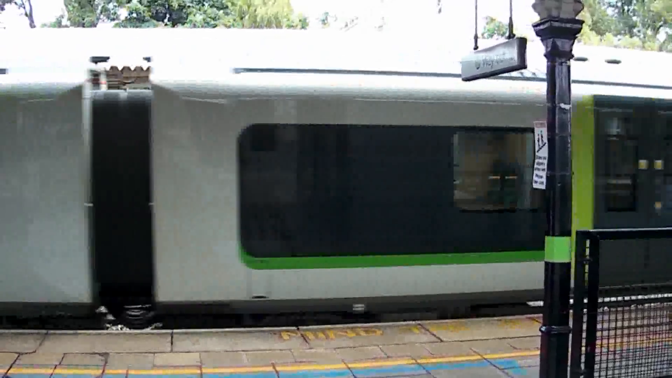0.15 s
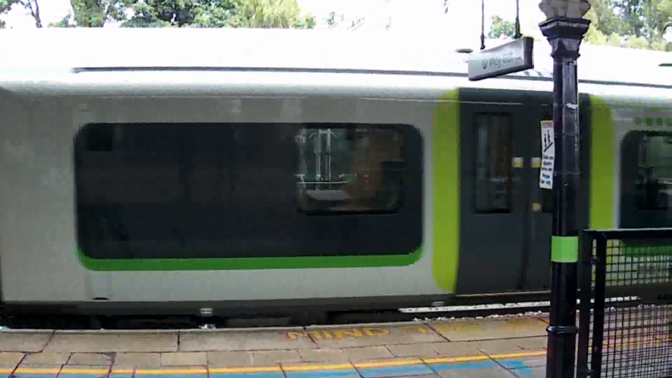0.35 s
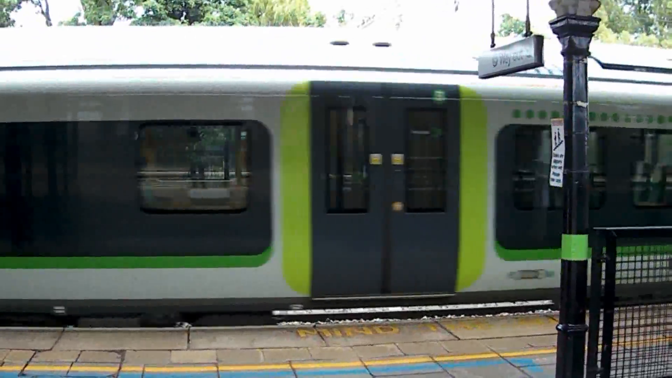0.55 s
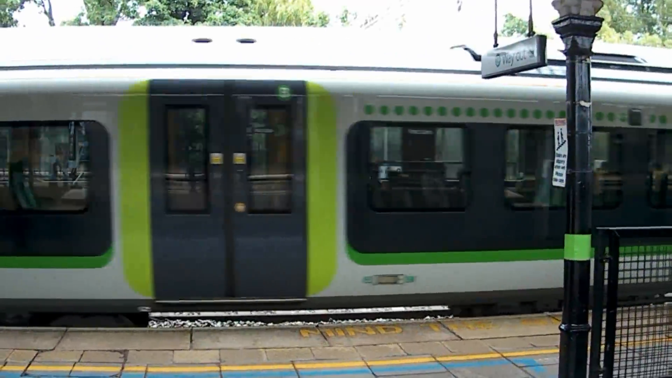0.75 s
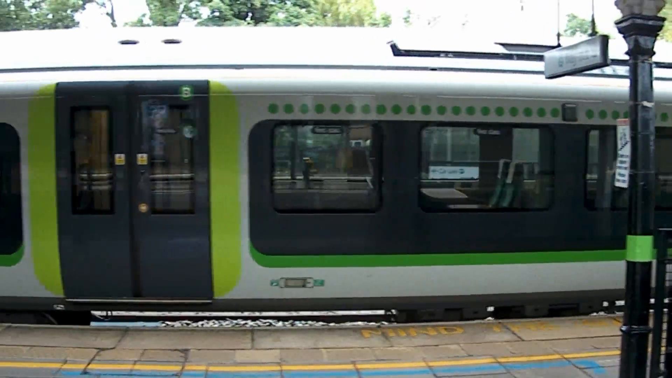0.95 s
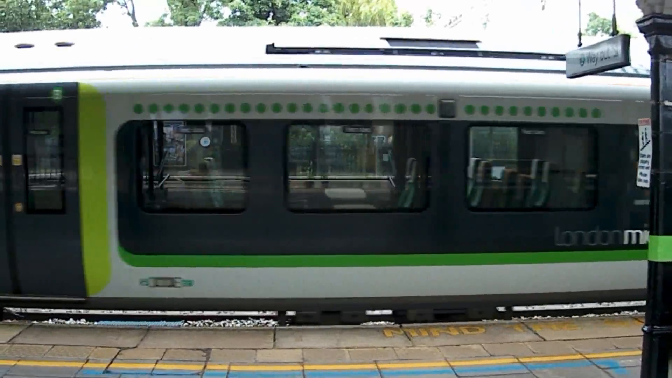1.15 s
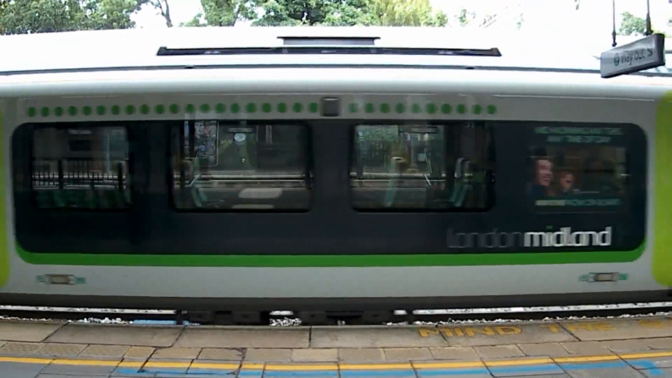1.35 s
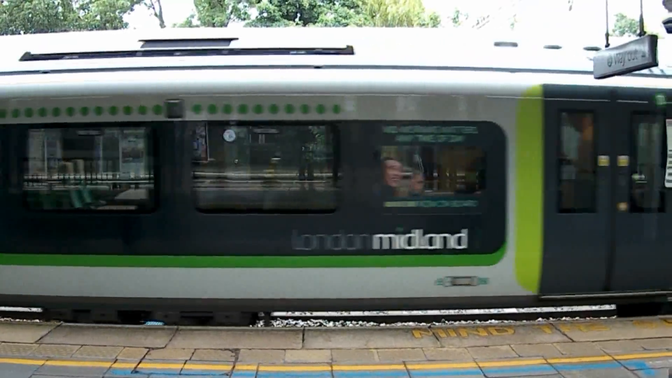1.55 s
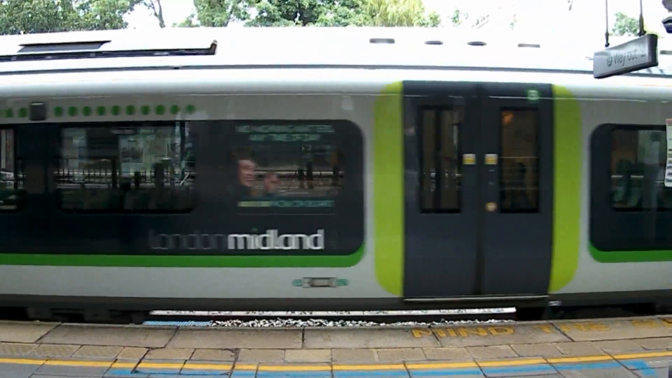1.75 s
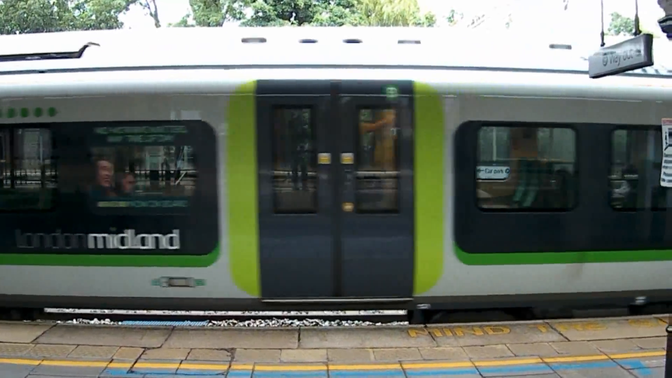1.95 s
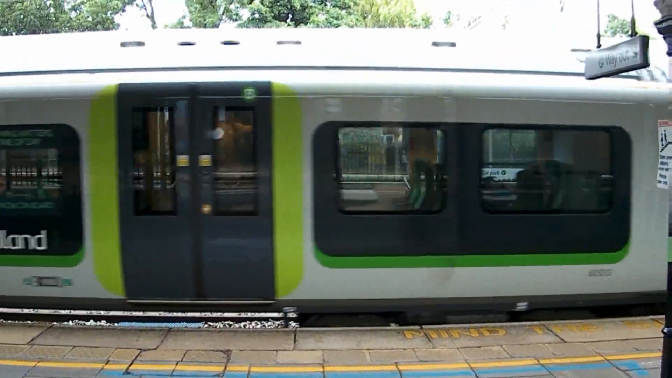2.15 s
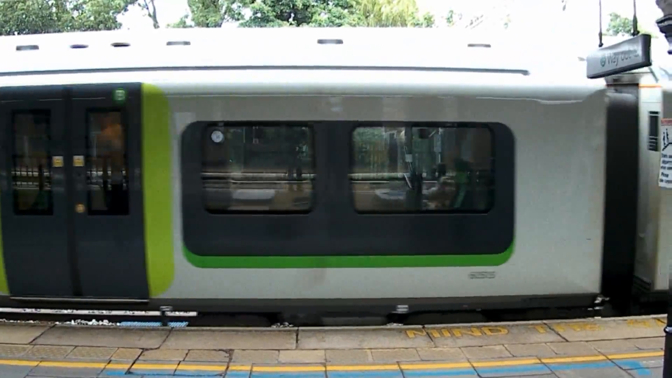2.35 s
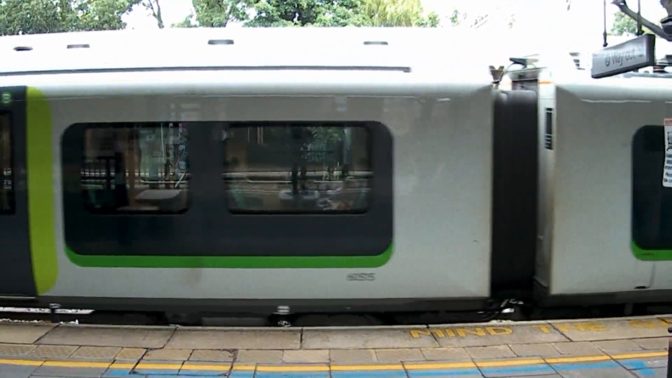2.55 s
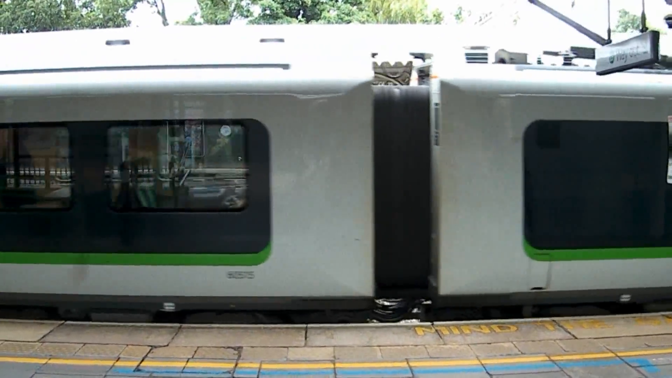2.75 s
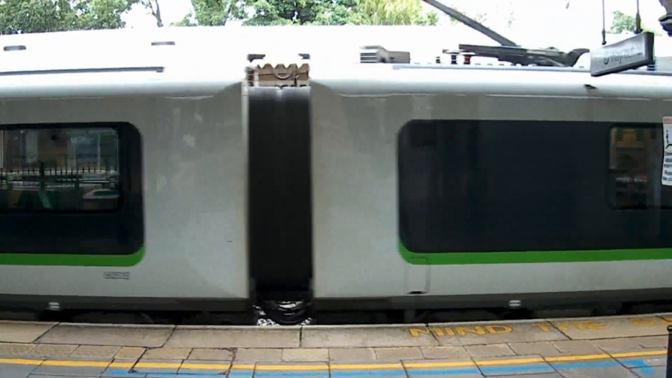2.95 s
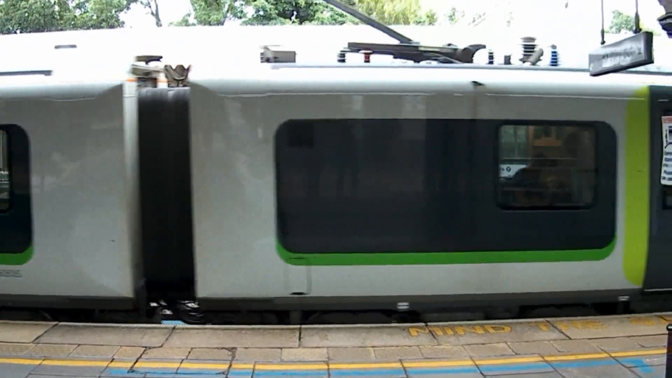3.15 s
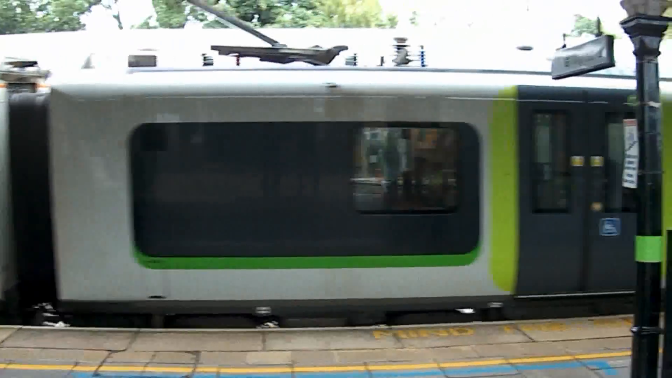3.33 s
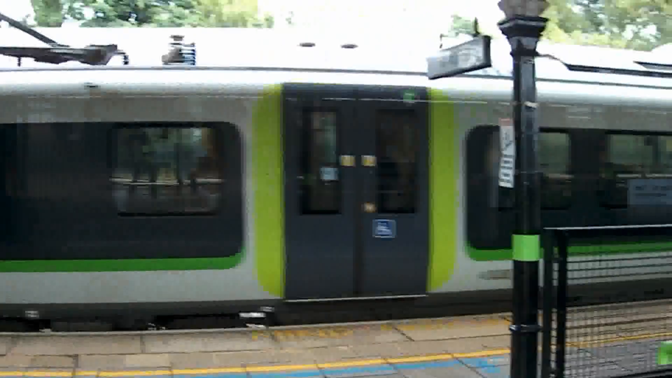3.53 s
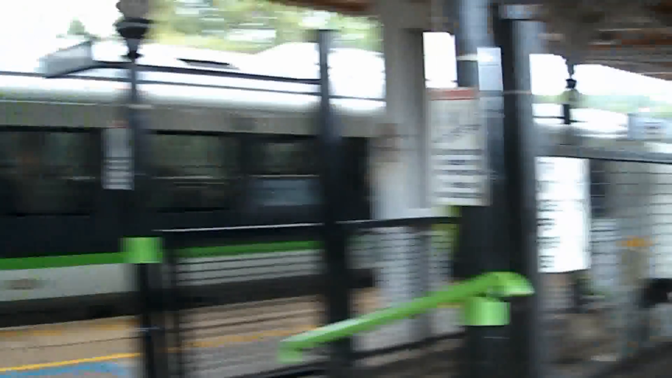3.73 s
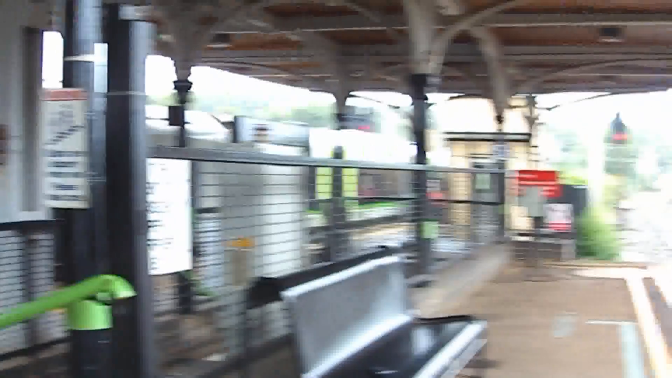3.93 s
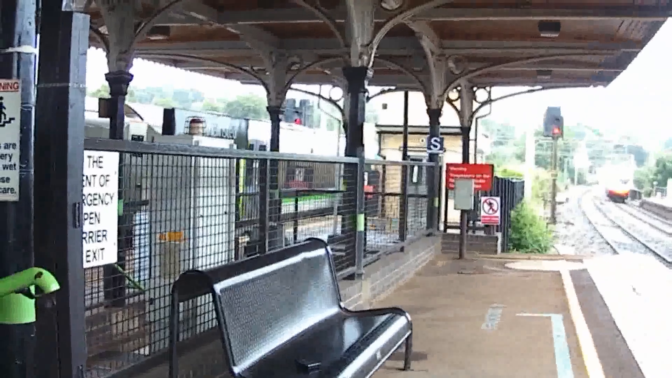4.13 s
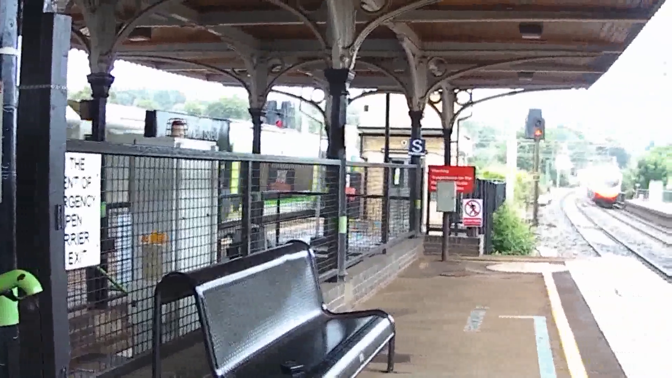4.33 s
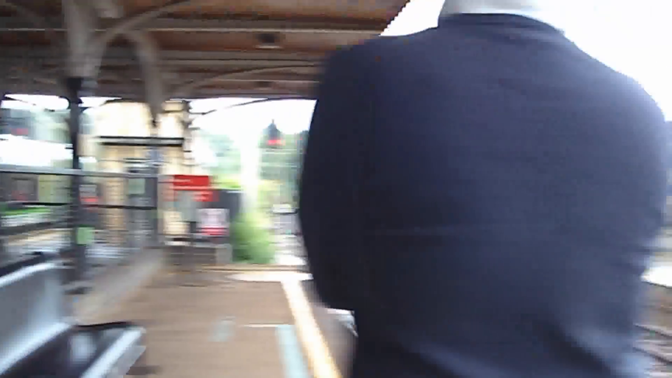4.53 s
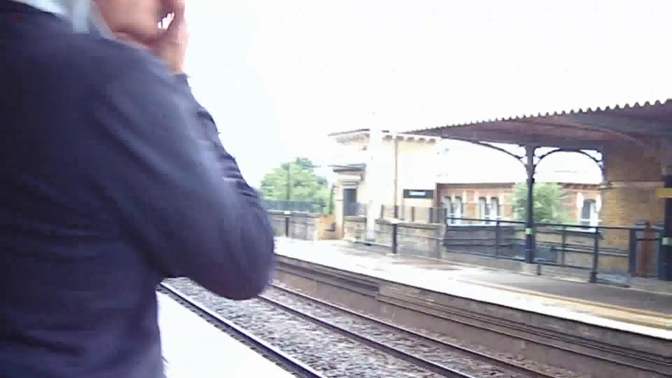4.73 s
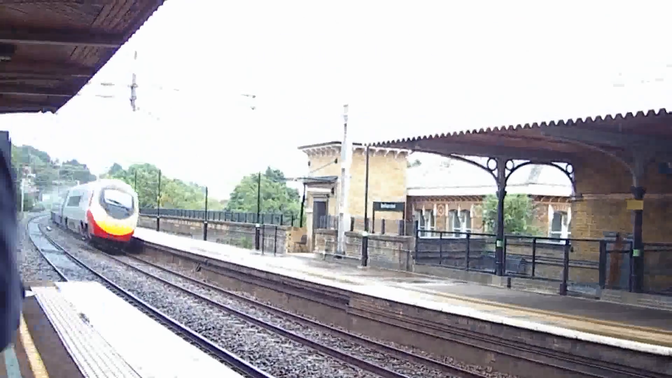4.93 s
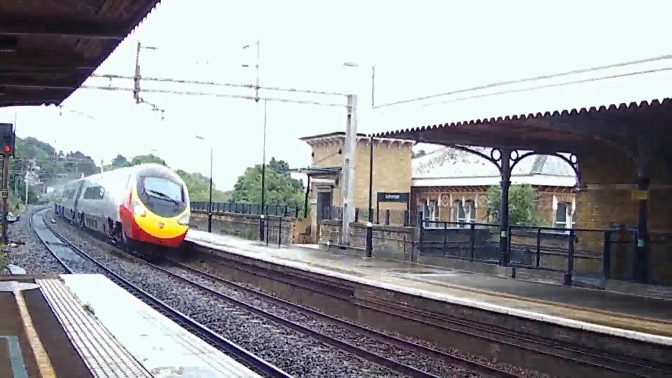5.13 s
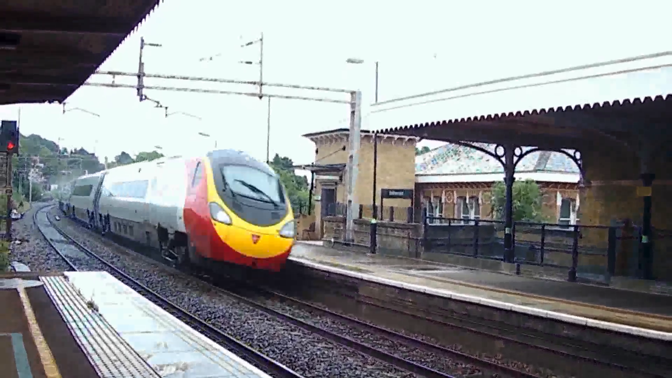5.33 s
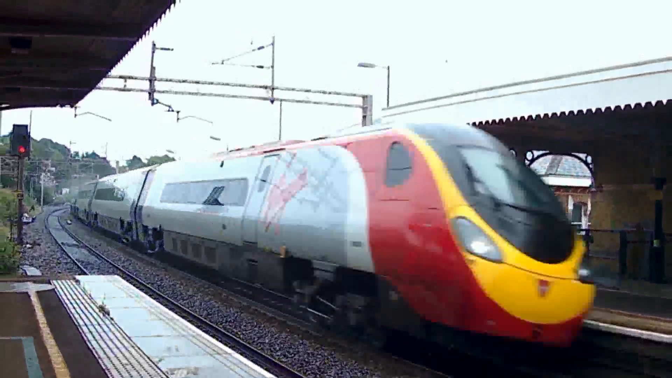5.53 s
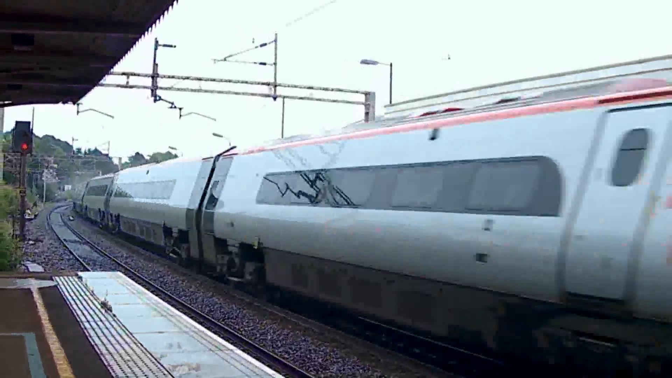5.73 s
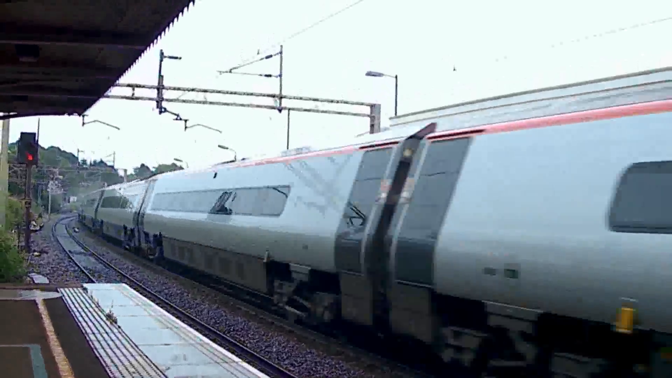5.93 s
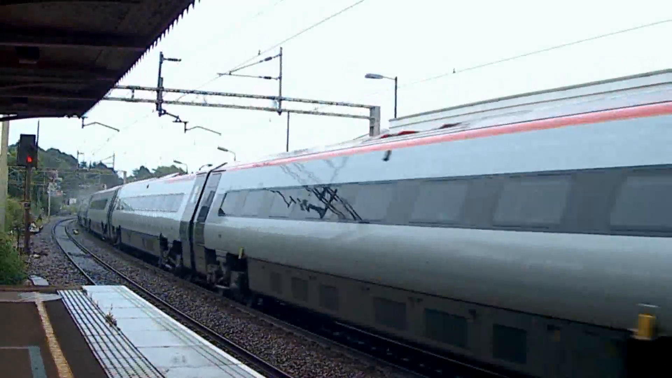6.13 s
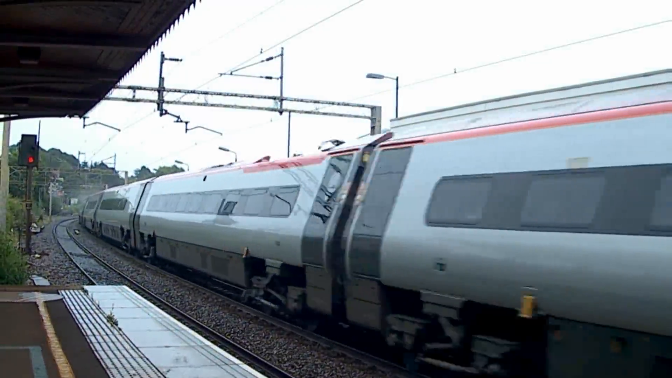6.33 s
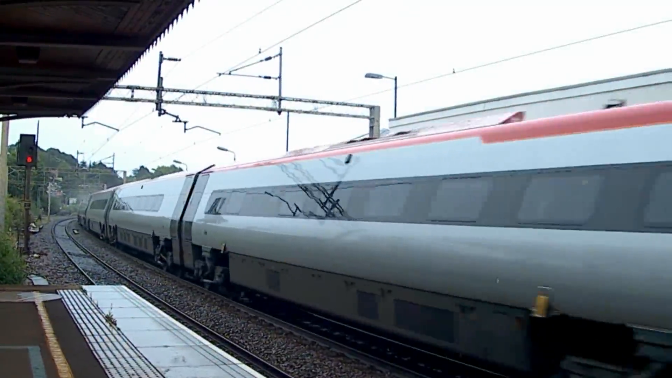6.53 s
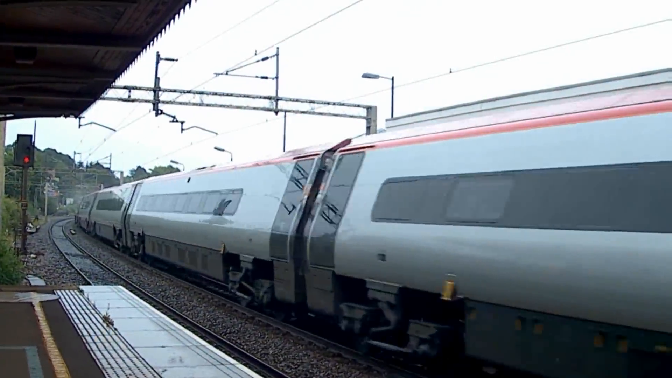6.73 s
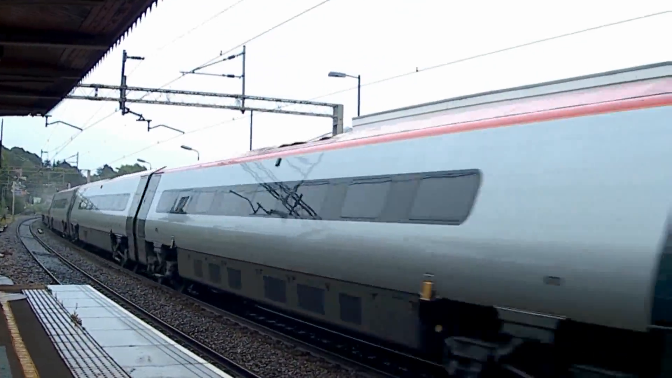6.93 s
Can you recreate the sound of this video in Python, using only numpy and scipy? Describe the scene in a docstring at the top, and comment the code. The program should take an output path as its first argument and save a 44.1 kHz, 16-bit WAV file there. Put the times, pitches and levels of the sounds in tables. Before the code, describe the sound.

Deep rumble and motor hum from a passing train give way to ringing rails and the loud rush of an express.

```python
"""A deep rumble, humming motors and knocks: a slow electric train rolls close past a station platform. As it
draws away, the rails of the fast line sing, shaken by each turn of distant wheels. Then an express rushes
through 6.7 m from the microphone: its nose shoves a blast of air across the platform, its wheels roar and ring,
and their flanges scrape. The small camera that holds the microphone passes a narrow band and overloads on the
express."""
import sys
import numpy as np
from scipy import signal
from scipy.fft import rfft, irfft, next_fast_len
from scipy.io import wavfile
from scipy.ndimage import uniform_filter1d, map_coordinates

SR = 44100
rng = np.random.default_rng(int(sys.argv[2]) if len(sys.argv) > 2 else 0)


def generate_wav(sig):
    """Save sig (samples, or channels by samples) to the path in sys.argv[1] as 16-bit PCM at SR."""
    pcm = np.round(np.clip(np.atleast_2d(sig).T, -1, 1) * 32767).astype(np.int16)
    wavfile.write(sys.argv[1], SR, pcm)


N = 312006
TIME = np.arange(N) / SR


def amp(db):
    """Decibels to gain."""
    return 10 ** (np.asarray(db) / 20)


def unit(x):
    """Scale to rms 1."""
    return x / np.sqrt(np.mean(x ** 2) + 1e-20)


def curves(rows):
    """One value per sample for each column after the time."""
    times, *columns = np.transpose(rows)
    return [np.interp(TIME, times, column) for column in columns]


def wobble(rate):
    """A smooth random curve, rate knots a second."""
    return map_coordinates(rng.standard_normal(int(N * rate / SR) + 4), [TIME * rate])


def filtered(x, response):
    """Filter x by a response given as a function of frequency."""
    size = next_fast_len(len(x) + 8192)
    return irfft(rfft(x, size) * response(np.fft.rfftfreq(size, 1 / SR)), size)[:len(x)]


def shape(points):
    """The response through (f/Hz, level/dB) points on a log axis."""
    f, db = np.transpose(points)
    return lambda hz: amp(np.interp(np.log(hz + 1), np.log(f), db))


def rush(spectrum, patchy_db):
    """Turbulent noise of rms 1, its gain varying in random patches of time and frequency."""
    cells = signal.stft(rng.standard_normal(N), nperseg=1024)[2]
    patches = uniform_filter1d(rng.standard_normal(cells.shape), size=5, axis=0)
    patches = uniform_filter1d(patches, size=10, axis=1)
    patchy = signal.istft(cells * amp(patchy_db * unit(patches)), nperseg=1024)[1][:N]
    return unit(filtered(patchy, shape(spectrum)))


def ringing(modes, roughness):
    """Steel resonances shaken by surface roughness, rms 1."""
    def gain(hz):
        peaks = (amp(db) / (1 + ((hz - f) / half_width) ** 2) for f, half_width, db in modes)
        return np.sqrt(sum(peak ** 2 for peak in peaks))
    return unit(filtered(roughness, gain))


def passing(rows):
    """Gain of things that swell and fade as they pass the microphone; their powers add."""
    powers = (amp(db) ** 2 * np.exp(-((TIME - s) / half_length) ** 2) for s, half_length, db in rows)
    return np.sqrt(sum(powers))


def tones(rows, doppler, waver_hz, flutter_db):
    """Unsteady notes that swell, fade and sink a little in pitch as their source passes."""
    out = np.zeros(N)
    for s, hz, half_length, db in rows:
        near = np.abs(TIME - s) < 4 * half_length
        t = TIME[near]
        place = (t - s) / half_length
        waver, flutter = (map_coordinates(knots, [t * 40])
                          for knots in rng.standard_normal((2, N // 1000)))
        pitch = hz * (1 - doppler * np.tanh(place)) + waver_hz * waver
        level = amp(db + flutter_db * flutter) * np.exp(-place ** 2 / 2)
        out[near] += level * np.sin(2 * np.pi * np.cumsum(pitch) / SR)
    return out


# hissing resonances of the fast line: f/Hz, half width/Hz, relative level/dB
RAIL_HISS_MODES = [(3674, 170, 4), (4140, 340, -4)]
def rail_hiss(full_db=-50, rise_db=5, flutter_db=1.5):
    """A thin, fluttering hiss in the steel, growing while the express is still far off."""
    level_db = full_db + np.interp(TIME, [1.5, 3.3], [-rise_db, 0]) - flutter_db * wobble(25)
    return amp(level_db) * ringing(RAIL_HISS_MODES, rng.standard_normal(N))


# echoes between train side, platform and roof: delay/s, gain
CANOPY_ECHOES = [(0.019, 0.087), (0.032, 0.2), (0.046, 0.13)]
def canopy(x):
    """Under the platform roof a few echoes comb the sound hollow; the power stays the same."""
    def comb(hz):
        return 1 + sum(gain * np.exp(-2j * np.pi * hz * delay) for delay, gain in CANOPY_ECHOES)
    return filtered(x, comb) / np.sqrt(1 + sum(gain ** 2 for _, gain in CANOPY_ECHOES))


# spectra of the underframe and of the wheels on the rail: f/Hz, relative level/dB
RUMBLE_SPECTRUM = [(10, -9.5), (25, 2.5), (42, 0.5), (90, -3.5), (130, -7.5), (200, -13), (300, -19.5),
                   (600, -40.5)]
ROLLING_SPECTRUM = [(80, -17.5), (210, 8), (290, 0.5), (380, -0.5), (520, -0.5), (720, 0.5), (1000, -1),
                    (1200, -3), (1550, -5), (1830, -4.5), (2200, -14.5), (3000, -30), (4000, -32.5)]
HISS_SPECTRUM = [(1200, -15.5), (2000, -1.5), (2400, -5.5), (2800, -1.5), (3200, -6.5), (3800, -11.5)]
# wheel noise, before the fade as the train leaves: t/s, rolling level/dB, hiss level/dB
WHEEL_LEVELS = [(0.25, -30.5, -37), (1.2, -34, -41), (2.4, -34.5, -47), (3.2, -34, -44), (3.9, -34, -42.5)]
# rumble of bogies and heavy underfloor gear: nearest t/s, half length/s, level/dB
HEAVY_GEAR_PASSES = [(.08, 0.072, -23.5), (.35, 0.057, -26.5), (.63, 0.054, -32), (1.73, 0.2, -27.5),
                     (2.16, 0.16, -25.5), (2.5, 0.25, -25.5), (3.38, 0.22, -25)]
def slow_train(underframe_db=-32, lurch_db=2, leaves_s=4.04, leaving_db_per_s=14):
    """Close by, rumble swells with each bogie over the rolling noise; then the train draws away."""
    rolling_db, hiss_db = curves(WHEEL_LEVELS)
    swell = np.hypot(amp(underframe_db), passing(HEAVY_GEAR_PASSES))
    rumble = swell * amp(lurch_db * wobble(8.7)) * rush(RUMBLE_SPECTRUM, patchy_db=0.9)
    rolling = amp(rolling_db) * rush(ROLLING_SPECTRUM, patchy_db=1.5)
    hiss = amp(hiss_db) * rush(HISS_SPECTRUM, patchy_db=1.5)
    leaving_db = -leaving_db_per_s * np.maximum(TIME - leaves_s, 0)
    return amp(leaving_db) * (rumble + canopy(rolling + hiss))


# the slow train's bogies: nearest t/s, half length/s, level/dB
BOGIE_PASSES = [(.279, 0.16, -37), (2.35, 0.12, -38.5), (3.34, 0.13, -35.5)]
# thrum of a bogie frame: f/Hz, relative level/dB
THRUM_SPECTRUM = [(70, -18), (130, 1.5), (320, 5.5), (450, -5.5), (800, -0.5), (1200, -18), (2500, -47.5)]
def bogies(judder_db=2.5):
    """Each bogie judders and thrums for the moment it is right in front of the microphone."""
    level = passing(BOGIE_PASSES) * amp(judder_db * wobble(28))
    return level * unit(filtered(rng.standard_normal(N), shape(THRUM_SPECTRUM)))


# hum and whine of the traction motors: nearest t/s, half length/s, level/dB
HUM_PASSES = [(.515, 0.2, -37), (1.2, 0.24, -35.5), (1.85, 0.062, -32.5), (2.96, 0.2, -32.5)]
WHINE_PASSES = [(1.293, 0.12, -40), (1.97, 0.21, -38.5)]
def motors(start_hz=288.3, braking_hz_per_s=30, waver_hz=2.1, flutter_db=3.0):
    """The motors share one pitch, falling as the train slows; each is heard as it goes by."""
    pitch = start_hz - braking_hz_per_s * TIME + waver_hz * wobble(45)
    phase = 2 * np.pi * np.cumsum(pitch) / SR

    def harmonic(rows, order):
        return passing(rows) * amp(flutter_db * wobble(34.98)) * np.sin(order * phase)
    return harmonic(HUM_PASSES, order=1) + harmonic(WHINE_PASSES, order=3)


# notes of passing equipment, and at 3.7 s the rails' howl: nearest t/s, f/Hz, half length/s, level/dB
PASSING_NOTES = [(.1, 204.2, 0.064, -29), (0.281, 1330, 0.4, -44), (.42, 405.4, 0.31, -39.5),
                 (0.383, 2740, 0.35, -52), (1.05, 509, 0.11, -39), (2.71, 753, .08, -41),
                 (3.7, 638, 0.27, -39)]
def passing_notes():
    """Each passing source carries its own wavering note along the platform edge."""
    return tones(PASSING_NOTES, doppler=0.00746, waver_hz=5.8, flutter_db=4.5)


# jolts of running gear and track: t/s, level/dB, centre f/Hz, width/octaves, 60 dB decay/s
GEAR_KNOCKS = [(.125, -29, 202, 0.56, .1), (.328, -24.5, 280, 0.66, 0.1), (.6, -29, 300, 1, 0.25),
               (.716, -20.5, 750, 0.91, 0.048), (2.083, -23, 1500, 0.32, 0.029),
               (2.096, -27, 106, 0.36, 0.15), (2.192, -21, 331, 0.57, 0.033),
               (2.329, -22.5, 340, 0.78, 0.1), (2.51, -29.5, 600, 0.47, .23),
               (2.658, -18.5, 80, 0.38, 0.11), (2.857, -19, 70, 0.55, 0.12), (3.221, -32, 2500, 0.32, 0.03),
               (3.228, -27.5, 546, .8, 0.12), (3.265, -26, 425, 0.78, 0.17), (3.38, -23, 990, 0.63, 0.031),
               (3.419, -25.5, 240, 0.91, 0.092), (3.51, -29, 700, 0.62, 0.13), (3.758, -26, 850, 0.41, 0.1),
               (3.98, -24, 777, 0.76, 0.23), (3.995, -24, 950, .8, 0.065), (4.275, -17, 950, 0.52, 0.021),
               (4.298, -19, 950, 0.39, 0.043)]
def knocks(attack_s=0.0012):
    """Heavy, well damped parts jolt close by: short bursts with no clear note."""
    out, t = np.zeros(N + SR), np.arange(SR // 4) / SR
    for s, db, centre_hz, octaves, t60 in GEAR_KNOCKS:
        band = lambda hz: np.exp(-(np.log2((hz + 1) / centre_hz) / octaves) ** 2 / 2)
        envelope = amp(-60 * t / t60) * (1 - np.exp(-t / attack_s))
        burst = unit(envelope * filtered(rng.standard_normal(len(t)), band))
        out[round(s * SR):][:len(t)] += amp(db) * np.sqrt(np.mean(envelope ** 2)) * burst
    return out[:N]


def wheel_roughness(tread_share, turn_hz=20.53, drift=0.00335):
    """The tread's share of the roughness comes round with every turn; the rail's is always new."""
    one_turn = irfft(np.exp(2j * np.pi * rng.random(int(SR / turn_hz / 2))))
    turns = np.cumsum(turn_hz * (1 + drift * wobble(8))) / SR
    tread = unit(map_coordinates(one_turn, [turns % 1 * len(one_turn)], order=1, mode="nearest"))
    return np.sqrt(tread_share) * tread + np.sqrt(1 - tread_share) * rng.standard_normal(N)


def rail_swell(full_db, rise_db_per_s, waver_db, full_s=5.25):
    """Steel damps vibration by the metre, so the level climbs evenly in dB as the express nears."""
    fade_in = np.interp(TIME, [3.0, 3.7], [0, 1])
    damping_db = rise_db_per_s * np.maximum(full_s - TIME, 0)
    return fade_in * amp(full_db - damping_db + waver_db * wobble(6.2))


def flares(rows, attack_s=0.044):
    """Gain of quick rises that die away more slowly."""
    gain = np.zeros(N)
    for s, db, decay_s in rows:
        rise = np.clip((TIME - s) / attack_s, 0, 1)
        gain += amp(db) * rise * np.exp(-np.maximum(TIME - s - attack_s, 0) / decay_s)
    return gain


# rail and sleeper resonances, low to high: f/Hz, half width/Hz, relative level/dB
DRONE_MODES = [(518.5, 10, -2.5), (538, 21, -5.5)]
HOWL_MODES = [(583, 21, -2), (637, 5.4, 1), (660, 5.7, 4.5), (712, 69, -2)]
RING_MODES = [(825, 28, -7), (920, 34, -7), (953, 12, -1.5), (998, 12, 0), (1065, 21, -5.5), (1082, 25, -6),
              (1267, 240, -14.5)]
# the rails flare up: t/s, level/dB, decay time/s
HOWL_FLARE_UPS = [(4.38, -27.5, 1), (5.56, -16, 0.076)]
RING_FLARE_UPS = [(3.95, -34, 1), (4.72, -34.5, 0.29)]
def rails():
    """The rails carry the wheels' whirr to the platform ahead of the express and sing with it."""
    tread_share = np.interp(TIME, [5.4, 6.1], [0.42, 0.083])  # alongside, many wheels blur the pattern
    drone = rail_swell(full_db=-26, rise_db_per_s=12, waver_db=0.8)
    howl = np.hypot(rail_swell(full_db=-28.5, rise_db_per_s=8.5, waver_db=0), flares(HOWL_FLARE_UPS))
    ring = np.hypot(rail_swell(full_db=-22, rise_db_per_s=12, waver_db=2.3), flares(RING_FLARE_UPS))
    voices = [(drone, DRONE_MODES), (howl, HOWL_MODES), (ring, RING_MODES)]
    return sum(level * ringing(modes, wheel_roughness(tread_share)) for level, modes in voices)


# notes in the fast line's rails: loudest t/s, f/Hz, half length/s, level/dB
SINGING_NOTES = [(4.12, 1008, .17, -32.5), (4.7, 675.5, .25, -32.5), (4.8, 636, .25, -34.5),
                 (4.8, 511, .05, -29.5), (4.85, 1001, .05, -23.5), (4.97, 964, .06, -28),
                 (5.25, 511, .07, -25.5), (6.15, 1001, .085, -13)]
def rail_notes():
    """Single rail resonances catch and sing out."""
    return tones(SINGING_NOTES, doppler=0.001, waver_hz=3.5, flutter_db=1.5)


# resonances of the express's wheels: f/Hz, half width/Hz, relative level/dB
WHEEL_MODES = [(938, 50, 3.5), (1851, 36, 2.5)]
# ringing at each coach end: nearest t/s, half length/s, level/dB
RING_PASSES = [(5.798, 0.15, -22), (6.078, .13, -17), (6.5, .16, -17.5), (6.82, 0.18, -18.5)]
def wheel_rings(doppler=0.025, glide_s=0.16):
    """Each bogie's wheels ring sharp on the way in and sag in pitch as they pass the microphone."""
    ring, out = ringing(WHEEL_MODES, rng.standard_normal(N)), np.zeros(N)
    for s, half_length, db in RING_PASSES:
        pitch_ratio = 1 - doppler * np.tanh((TIME - s) / glide_s)
        position = (np.cumsum(pitch_ratio) + N * rng.random()) % N
        out += passing([(s, half_length, db)]) * np.interp(position, np.arange(N), ring)
    return out


# air around the express's nose and along its side: t/s, half length/s, level/dB
AIR_BUFFETS = [(4.78, 0.13, -29), (5.25, .1, -23), (5.55, 0.04, -11.5), (5.66, .04, -13),
               (5.78, 0.046, -17.5), (6.79, .03, -12.5), (6.93, 0.017, -15)]
# spectrum of the buffets: f/Hz, relative level/dB
BUFFET_SPECTRUM = [(12, -7.5), (24, 8.5), (45, -2.5), (75, -7), (200, -10), (400, -35.5)]
def bow_wave():
    """Air hits the platform in short, deep buffets, hardest as the nose goes by."""
    return passing(AIR_BUFFETS) * rush(BUFFET_SPECTRUM, patchy_db=2.5)


# spectra of the slipstream and of the wheel roar: f/Hz, relative level/dB
BLAST_SPECTRUM = [(10, -12.5), (26, 2.5), (45, 0.5), (90, 0.5), (190, -2.5), (300, -7.5), (450, -8),
                  (900, -42)]
ROAR_SPECTRUM = [(120, -10), (320, 2), (550, 6.5), (850, 7), (1100, 2), (1300, 2), (1600, 2.5), (1950, 4.5),
                 (2400, -5), (2700, -5), (3150, -8), (3700, -11.5)]
# the roar surges with each bogie: nearest t/s, half length/s, relative level/dB
BOGIE_SURGES = [(5.76, 0.045, -2.5), (6.13, 0.07, -3.5), (6.52, 0.079, -6), (6.83, 0.059, 0),
                (7.03, 0.08, -2.5)]
# flanges scraping in the curve: f/Hz, half width/Hz, relative level/dB
FLANGE_MODES = [(2620, 150, 1), (3416, 110, -2), (3674, 110, -1), (4030, 80, 2.5)]
# their harder scrapes: t/s, half length/s, level/dB against the steady roar
FLANGE_SCRAPES = [(6.08, 0.077, -16.5), (6.49, 0.07, -12), (6.62, 0.027, -12.5), (6.9, 0.096, -12.5),
                  (7.02, 0.049, -13)]
def express(arrival_s=5.65, speed_m_per_s=52.7, track_m=6.7, gust_s=0.32, roar_db_per_s=1.53):
    """Wheel roar and rushing air grow as the nose nears the microphone; alongside, flanges sizzle."""
    ahead_m = speed_m_per_s * np.maximum(arrival_s - TIME, 0)
    since_s = np.maximum(TIME - arrival_s, 0)
    distance_gain = track_m / np.hypot(track_m, ahead_m)
    fade_in = np.interp(TIME, [3.8, 4.6], [0, 1])
    alongside = np.interp(TIME, [5.4, 5.95], [0, 1])
    blast_db = -17 + 5 * np.exp(-since_s / gust_s)  # steady slipstream plus the nose's gust
    blast = amp(blast_db) * rush(BLAST_SPECTRUM, patchy_db=2.3)
    steady_roar = amp(-13 + roar_db_per_s * since_s)
    surging = np.hypot(1, amp(-3) * passing(BOGIE_SURGES))
    roar = steady_roar * surging * rush(ROAR_SPECTRUM, patchy_db=0.23)
    scraping = np.hypot(amp(-24) * alongside, passing(FLANGE_SCRAPES))
    flutter = amp(3 * wobble(30))
    scrape = steady_roar * scraping * flutter * ringing(FLANGE_MODES, rng.standard_normal(N))
    return fade_in * distance_gain * (blast + roar + scrape)


def scene():
    """Both trains from one spot on the platform, in mono."""
    slow_line = slow_train() + bogies() + motors() + passing_notes() + knocks()
    singing_rails = rail_hiss() + rails() + rail_notes()
    fast_line = wheel_rings() + bow_wave() + express()
    return (slow_line + singing_rails + fast_line)[None]


# the camera's narrow band, with a weak mirrored lobe near 4.3 kHz: f/Hz, level/dB
CAMERA_RESPONSE = [(3700, 1.5), (3800, -2.5), (3900, -16.5), (4000, -30), (4300, -5.5), (4450, -25),
                   (4700, -73)]
# treble loss that softens the overload crackle: f/Hz, level/dB
CRACKLE_RESPONSE = [(3800, 0), (4700, -7), (9000, -3), (15000, -6.5)]
def record(dry, ceiling=0.705, top_hz=15830):
    """The camera keeps a narrow band; the loudest peaks clip flat and crackle."""
    narrow = filtered(dry[0], shape(CAMERA_RESPONSE))
    clipped = np.clip(narrow, -ceiling, ceiling)
    return filtered(clipped, lambda hz: shape(CRACKLE_RESPONSE)(hz) * (hz < top_hz))[None]


dry = scene()
out = record(dry)
generate_wav(out)
```